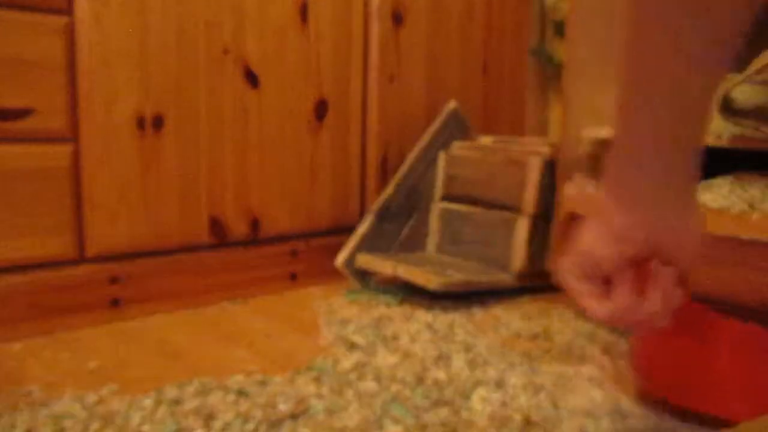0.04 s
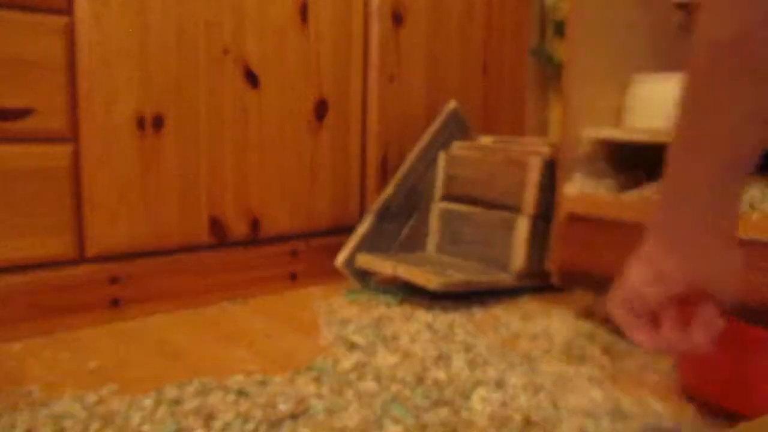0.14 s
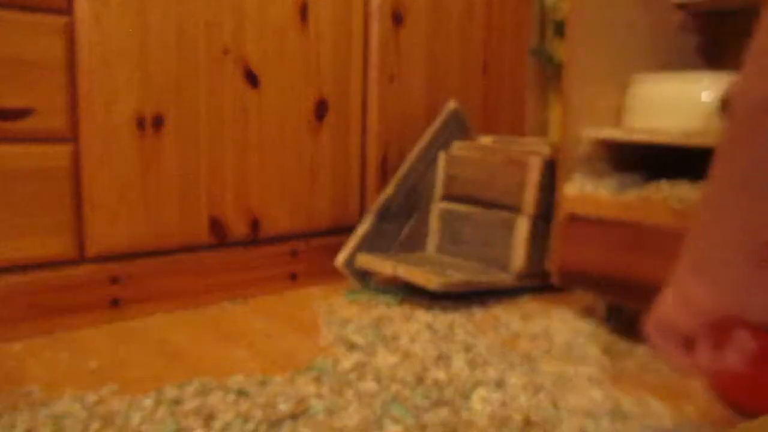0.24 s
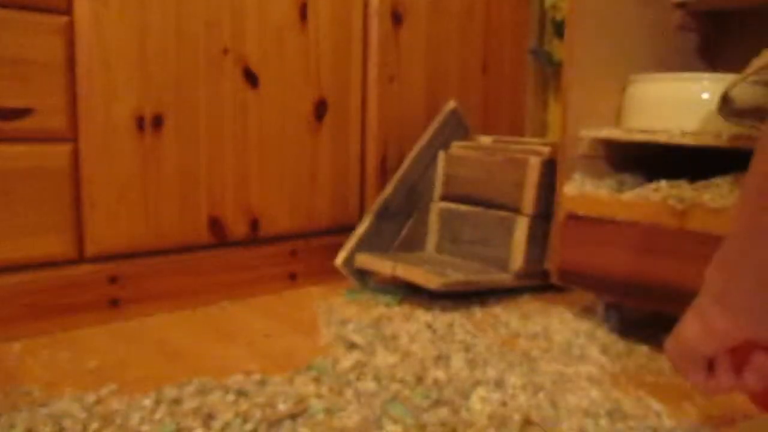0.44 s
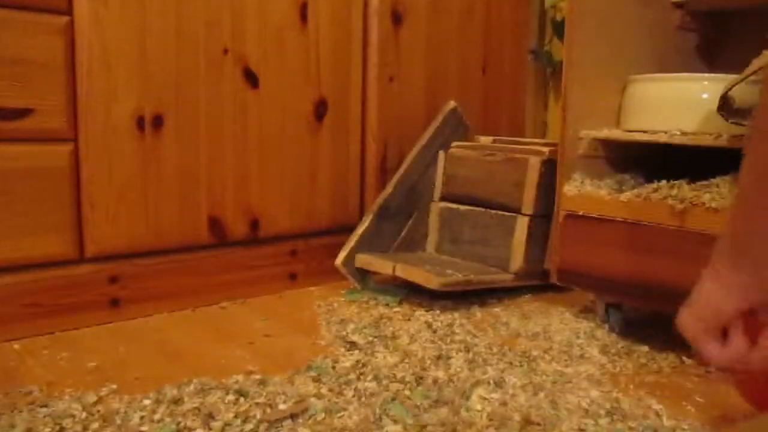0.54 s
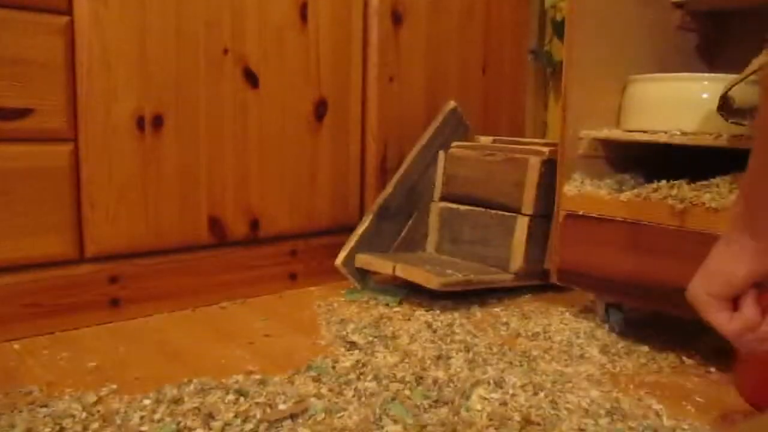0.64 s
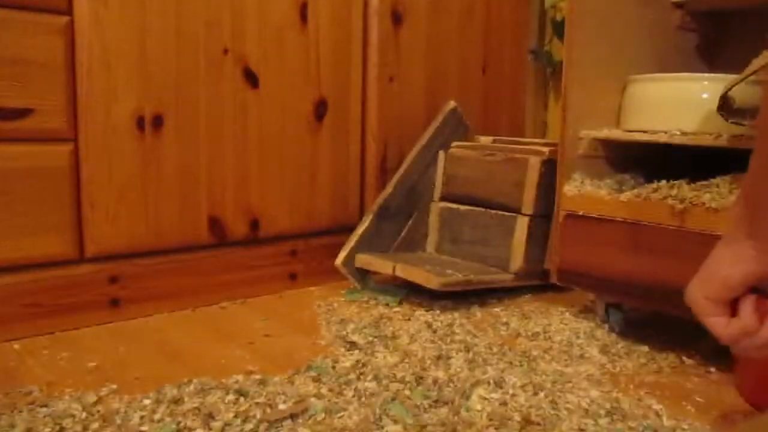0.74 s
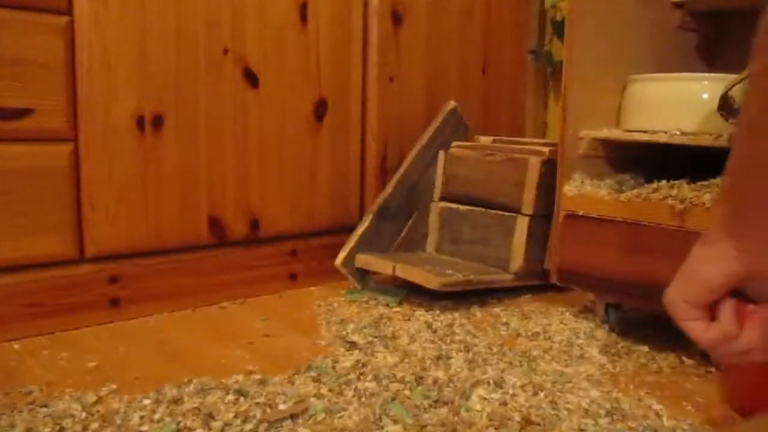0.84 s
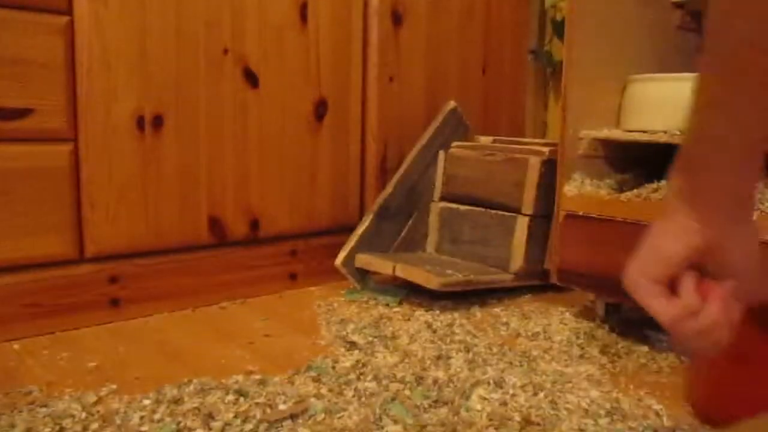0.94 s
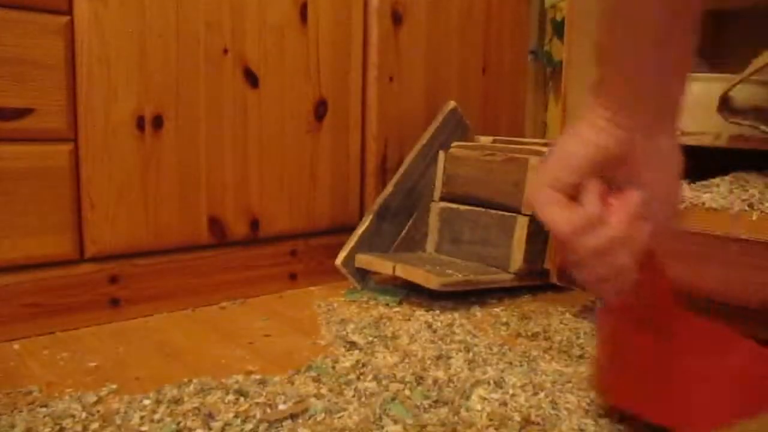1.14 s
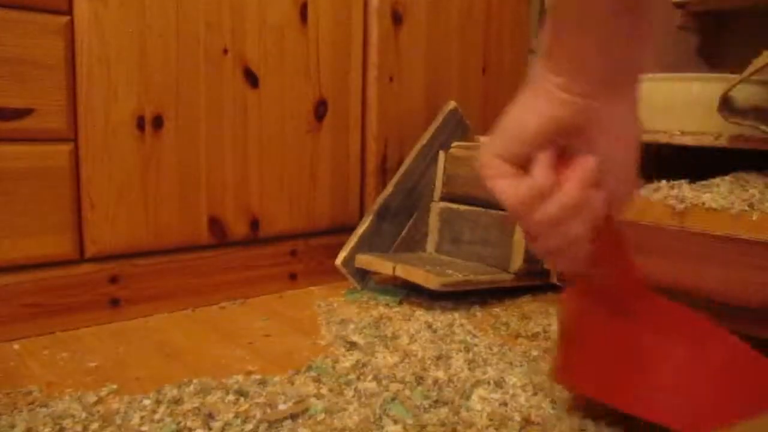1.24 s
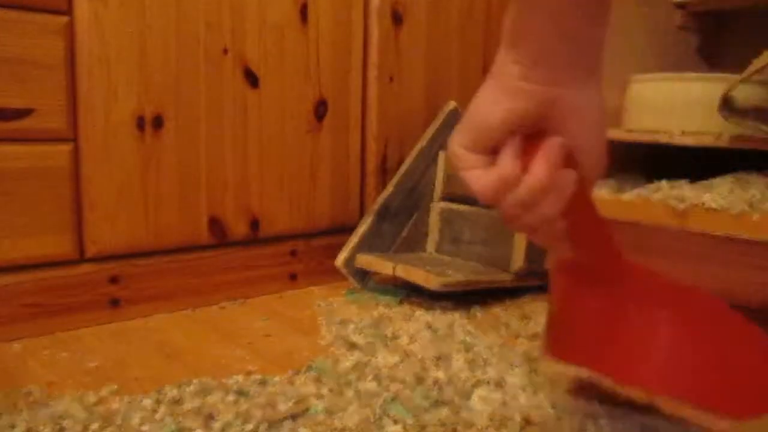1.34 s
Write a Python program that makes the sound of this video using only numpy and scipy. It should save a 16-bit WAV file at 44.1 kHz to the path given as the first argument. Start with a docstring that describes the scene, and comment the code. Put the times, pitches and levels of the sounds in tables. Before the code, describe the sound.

Close by in a small room, a plastic dustpan rattles along floorboards, ending in one hard knock. Soft hollow bumps follow, then a dry, rustling scoop through loose chips, over faint hiss and appliance hum.

```python
"""A plastic dustpan judders over a wooden floor and stops with a sharp knock, in a small quiet room.
Its lip catches and slips, each catch ringing the plastic and thudding on the boards. The pan bumps
down softly a few times, then sweeps through loose litter in one rustling swell, its base droning.
Hiss and a faint appliance hum lie underneath; the camera's gain control ducks at the loud scrape."""
import sys
import numpy as np
from scipy import signal
from scipy.fft import rfft, irfft, next_fast_len
from scipy.io import wavfile
from scipy.ndimage import map_coordinates

SR = 44100
rng = np.random.default_rng(int(sys.argv[2]) if len(sys.argv) > 2 else 0)


def wav_out(sig):
    """Save sig, one row per channel (or a flat mono array), as 16-bit PCM at SR to the path in sys.argv[1]."""
    wavfile.write(sys.argv[1], SR, np.round(np.clip(np.atleast_2d(sig).T, -1, 1) * 32767).astype(np.int16))


N = 61739

# Stereo image in the room, narrow mids and wide highs: frequency_hz, left_right_correlation
STEREO_IMAGE = [(30, 0.31), (70, 0.44), (140, 0.98), (600, 0.95), (2000, 0.92), (4000, 0.8), (7000, 0.42),
                (12000, .03)]


def judder():
    """The pan's lip catches and slips along the boards."""
    # One row a catch: start_s, ring_db, thud_db, thud_pitch_hz, tick_db
    catches = [(.2165, -54, -47, 250.4, -33.5), (.2195, -20, -21, 229, -29.5), (.24, -39, -16, 222.3, -62),
               (.247, -21.5, -18, 227.8, -31), (.261, -21, -30, 220, -42), (.2935, -14.5, -27, 281, -25.5),
               (.324, -14.5, -30, 256, -28), (.346, -16.5, -19, 259.6, -45),
               (.3545, -18.5, -24.5, 261.8, -35), (.3915, -20.5, -18.5, 261.6, -52),
               (.409, -46, -13.5, 268, -39)]
    return contacts(catches, room_db=-4.5)


def knock():
    """One hard crack as the pan hits its stop; the plastic rings on and the room answers dully."""
    # Tone of the crack: frequency_hz, level_db
    crack_spectrum = [(30, -28), (120, -15.5), (280, -5.5), (450, -4), (680, -7.5), (1050, 0), (1400, -4),
                      (2100, -8), (2900, -18.5), (3700, -27.5), (5500, -34), (8000, -43), (16000, -52)]
    # Modes of the pan pinned against its stop: pitch_hz, level_db, t60_s
    pinned_modes = [(286, -16, 0.08), (568, -22.5, .4), (690, -19, 0.22), (740, -23, 0.04),
                    (906, -22, 0.16), (1015, -7, 0.041), (1537, -28.5, 0.17)]
    # Dark EQ on the reverb: frequency_hz, gain_db
    reverb_eq = [(200, 4.5), (1000, 0), (2500, -10), (6000, -19), (14000, -26)]
    start_s = .3797
    out, t = np.zeros((2, N)), np.arange(SR // 2) / SR
    crack = amp(-1.5) * np.pad(click(crack_spectrum), (0, SR // 2))
    reverb = in_room(crack, room_db=1) - crack
    add(out, start_s, crack + filtered(reverb, lambda hz: amp(along(reverb_eq, hz))))
    add(out, start_s, in_room(ring(pinned_modes, t, rise_s=.0015), room_db=-9))
    return out


def bumps():
    """The pan is softly set down or nudged."""
    # One row a touch: start_s, ring_db, thud_db, thud_pitch_hz, tick_db
    touches = [(.135, -83, -46, 322, -86), (.596, -33, -21, 293, -60), (.615, -48, -16, 260, -60),
               (.623, -34.5, -30, 306, -49), (.641, -41, -21, 297.6, -65), (.654, -56, -32.5, 226.5, -68),
               (.79, -43, -34.5, 230, -70), (.813, -36.5, -39, 220, -74), (.8205, -29, -19.5, 205.8, -48),
               (.838, -42, -28.5, 254, -78), (1.008, -29.5, -33, 296, -50), (1.061, -28.5, -33, 239, -56),
               (1.107, -26, -32.5, 281, -49), (1.284, -41.5, -32.5, 287.4, -71),
               (1.294, -63, -35.5, 244, -67)]
    return contacts(touches, room_db=-6.5)


def contacts(hits, room_db):
    """Each contact rings the pan, thuds on the boards and crushes a few chips with a tick."""
    # Modes of the plastic pan: pitch_hz, level_db, t60_s
    pan_modes = [(510.7, -17, 0.15), (575, -22, .2), (635, -16, 0.27), (786, -2.5, 0.063),
                 (870, -8.5, 0.077), (1100, -12.5, 0.072), (1281, -16, 0.076), (1422, -11.5, 0.034),
                 (1512, -11, 0.046), (2030, -7.5, 0.019), (2543, -15, 0.014), (3034, -28.5, 0.026)]
    # Hollow thud of pan on boards: pitch_ratio, level_db, t60_s
    thud_modes = [(.38, -22.5, 0.203), (.76, -8, 0.094), (1, 1.5, 0.048), (1.35, -9, 0.12),
                  (1.8, -13.5, 0.094), (2.3, -11.5, 0.062), (3.05, -20.5, 0.052)]
    # Tone of crushed chips: frequency_hz, level_db
    tick_spectrum = [(200, 13.5), (1000, 2.5), (2400, -5), (3800, -15.5), (5300, -1.5), (8000, -17),
                     (13000, -26.5), (16000, -58)]
    tick_t60_s, low_cut_hz = .026, 97
    out, t = np.zeros((2, N)), np.arange(SR // 2) / SR
    for start_s, ring_db, thud_db, thud_hz, tick_db in hits:
        plastic = amp(ring_db) * ring(pan_modes, t, rise_s=.00046)
        tuned_modes = [(ratio * thud_hz, db, t60) for ratio, db, t60 in thud_modes]
        thud = amp(thud_db) * ring(tuned_modes, t, rise_s=.0023)
        crunch = coloured(rng.standard_normal((2, len(t))), tick_spectrum)
        tick = amp(tick_db - 60 * t / tick_t60_s) * crunch
        add(out, start_s, in_room(plastic + thud + tick, room_db))
    return signal.sosfilt(signal.butter(2, low_cut_hz, "high", fs=SR, output="sos"), out)


def grind():
    """The lip grinds over grit for as long as the pan is shoved."""
    # Tone of grit under the lip: frequency_hz, level_db
    grit_spectrum = [(30, -47), (100, -29), (210, 12.5), (400, -1.5), (800, 5), (1200, -2.5), (2300, -4.5),
                     (3100, -11.5), (3900, -23), (5400, -18.5), (8000, -25.5), (12000, -40.5), (15000, -61)]
    start_s, end_s, attack_s, release_s = .216, .4, .03, .007
    t = np.arange(N) / SR
    push = np.clip((t - start_s) / attack_s, 0, 1) * np.exp(-np.maximum(t - end_s, 0) / release_s)
    return amp(-31) * push * coloured(grains(per_s=2800, scatter_db=1.5), grit_spectrum)


def litter():
    """Chips rustle against each other and slide over the hollow pan."""
    # Envelopes of the dry rustle and of the slide: time_s, level_db
    rustle_envelope = [(.2, -80), (.38, -76), (.46, -58), (.54, -79), (.565, -61), (.6, -69.5), (.635, -58),
                       (.69, -83), (.76, -95), (.78, -61.5), (.88, -50.5), (1.0, -45), (1.1, -44),
                       (1.16, -50), (1.27, -56), (1.4, -80)]
    slide_envelope = [(.2, -73), (.4, -34.5), (.55, -60), (.62, -46), (.7, -82), (.77, -67), (.84, -50.5),
                      (.9, -45.5), (1.02, -36), (1.11, -36.5), (1.16, -43), (1.27, -47), (1.34, -69.5),
                      (1.4, -69)]
    # Tone of the bright rustle and of the hollow slide: frequency_hz, level_db
    rustle_spectrum = [(300, -18), (2000, 0.5), (4000, -8.5), (5400, -1), (7000, -1), (9000, -7),
                       (12500, -17.5), (14500, -32)]
    slide_spectrum = [(30, -29), (80, -7.5), (190, 6), (285, -1.5), (410, 2.5), (520, 0.5), (590, 3),
                      (800, 6.5), (1200, 1.5), (1500, 3), (2200, 0), (3250, -3), (3900, -18), (7000, -26),
                      (14000, -64)]
    rustle = coloured(grains(per_s=10000, scatter_db=5), rustle_spectrum)
    slide = coloured(grains(per_s=3000, scatter_db=3.5), slide_spectrum)
    return amp(curve(rustle_envelope)) * rustle + amp(curve(slide_envelope)) * slide


def base_drone():
    """Pressed down in mid-sweep, the pan's base drones at an unsteady pitch."""
    # Envelope of the base rubbing the boards: time_s, level_db
    envelope = [(.8, -104), (.9, -49), (.98, -47), (1.005, -28.5), (1.045, -45), (1.075, -40.5), (1.1, -54),
                (1.13, -35), (1.165, -45.5), (1.2, -82), (1.26, -86)]
    pitch_hz = 291.5 * (1 + .035 * wobble(per_s=60.96))
    level_db = curve(envelope) + 2.7 * wobble(per_s=70.83)
    return amp(level_db) * unit(np.sin(2 * np.pi * np.cumsum(pitch_hz) / SR))


def in_room(x, room_db):
    """The sound plus a short room tail, each frequency dying at its own speed."""
    # Decay of the small room: frequency_hz, t60_s
    decay = [(100, 0.39), (260, 0.23), (700, 0.44), (1800, 0.44), (5000, 0.21), (12000, .18)]
    predelay_s = .003
    hz, t, noise = signal.stft(rng.standard_normal((2, SR // 2)), SR, nperseg=256)
    fading = noise * amp(-60 * t / along(decay, hz)[:, None])
    tail = spread(signal.istft(fading, SR, nperseg=256)[1])
    tail = np.pad(tail / np.linalg.norm(tail[0]), ((0, 0), (int(predelay_s * SR), 0)))
    return x + amp(room_db) * signal.fftconvolve(np.atleast_2d(x), tail, axes=1)[:, :x.shape[-1]]


def room_tone():
    """Wide microphone hiss and a faint appliance hum."""
    # Tone of the hiss: frequency_hz, level_db
    hiss_spectrum = [(25, -17), (120, -6.5), (210, 2.5), (400, -4.5), (800, -10.5), (2400, -21.5),
                     (3900, -32.5), (5500, -29), (10500, -38.5), (15000, -73)]
    # Width of the hiss, lows out of phase: frequency_hz, left_right_correlation
    hiss_image = [(50, -0.85), (450, -0.71), (2000, 0.76), (12000, 0.24)]
    hum_hz = 122.8
    hum = np.sqrt(2) * np.sin(2 * np.pi * hum_hz * np.arange(N) / SR)
    hiss = coloured(rng.standard_normal((2, N)), hiss_spectrum, hiss_image)
    return amp(-46) * hiss + amp(-58.5) * hum


def ring(modes, t, rise_s, scatter_db=1):
    """Damped modes, struck a little differently each time."""
    hz, db, t60 = np.transpose(modes)[:, :, None]
    level_db = db + scatter_db * rng.standard_normal(hz.shape) - 60 * t / t60
    polarity = (-1) ** np.arange(len(hz))[:, None]
    return (amp(level_db) * polarity * np.sin(2 * np.pi * hz * t)).sum(0) * (1 - np.exp(-t / rise_s))


def grains(per_s, scatter_db):
    """Two streams of tiny impacts at random times and of random size."""
    hits = (rng.random((2, N)) < per_s / SR) * rng.choice([-1, 1], (2, N))
    return unit(hits * amp(scatter_db * np.clip(rng.standard_normal((2, N)), -2, 2)))


def click(spectrum, size=4096):
    """The tightest (minimum-phase) pulse with this spectrum, peak 1."""
    cepstrum = irfft(np.log(amp(along(spectrum, np.fft.rfftfreq(size, 1 / SR)))))
    cepstrum[1:size // 2] *= 2
    cepstrum[size // 2 + 1:] = 0
    pulse = irfft(np.exp(rfft(cepstrum)))
    return pulse / np.abs(pulse).max()


def coloured(pair, spectrum, image=STEREO_IMAGE):
    """A stereo texture of rms 1 with this spectrum."""
    texture = signal.fftconvolve(spread(pair, image), click(spectrum)[None], axes=1)
    return unit(texture[:, :pair.shape[1]])


def spread(pair, image=STEREO_IMAGE):
    """Two unrelated signals become left and right, as correlated as the image says."""
    angle = lambda hz: np.arccos(np.clip(along(image, hz), -1, 1)) / 2
    mid, side = filtered(pair, lambda hz: np.array([np.cos(angle(hz)), np.sin(angle(hz))]))
    return np.array([mid + side, mid - side])


def filtered(x, response):
    """Zero-phase EQ with gain response(hz)."""
    n = x.shape[-1]
    size = next_fast_len(n + SR // 4)
    return irfft(rfft(x, size) * response(np.fft.rfftfreq(size, 1 / SR)), size)[..., :n]


def wobble(per_s):
    """A smooth curve through per_s random points a second."""
    return map_coordinates(rng.standard_normal(int(N * per_s / SR) + 4), [np.arange(N) * per_s / SR])


def along(points, hz):
    """(frequency_hz, value) points read on a log axis."""
    point_hz, values = np.transpose(points)
    return np.interp(np.log(hz + 1), np.log(point_hz + 1), values)


def curve(points):
    """(time_s, value) points joined into one value per sample."""
    return np.interp(np.arange(N) / SR, *np.transpose(points))


def add(out, start_s, x):
    """Mixes x into out at start_s."""
    part = out[:, round(start_s * SR):][:, :x.shape[-1]]
    part += x[..., :part.shape[1]]


def amp(db):
    """Decibels to gain."""
    return 10 ** (np.asarray(db) / 20)


def unit(x):
    """Scaled to rms 1."""
    return x / np.sqrt(np.mean(x ** 2) + 1e-20)


def scene():
    """The dustpan works close to the microphone and a little to the right, over the room tone."""
    close_db, balance_db = 5.5, [[-.3], [.3]]
    impacts = judder() + bumps() + knock()
    friction = in_room(grind() + litter(), room_db=-6.5) + in_room(base_drone(), room_db=-11.5)
    return (impacts + friction) * amp(close_db) * amp(balance_db) + room_tone()


def record(dry):
    """The camera's gain control ducks at loud sound and creeps back; a high cut trims the top."""
    threshold_db, window_s, recovery_db_per_s, high_cut_hz = -19.5, .027, 2, 16700
    size = int(window_s * SR)
    power = np.abs(signal.fftconvolve(np.mean(dry ** 2, 0), np.ones(size) / size)[:N])
    over_db = np.maximum(10 * np.log10(power + 1e-12) - threshold_db, 0)
    recovery_db = recovery_db_per_s * np.arange(N) / SR
    gain_db = recovery_db - np.maximum.accumulate(over_db + recovery_db)
    return filtered(dry * amp(gain_db), lambda hz: hz < high_cut_hz)


dry = scene()
out = record(dry)
wav_out(out)
```